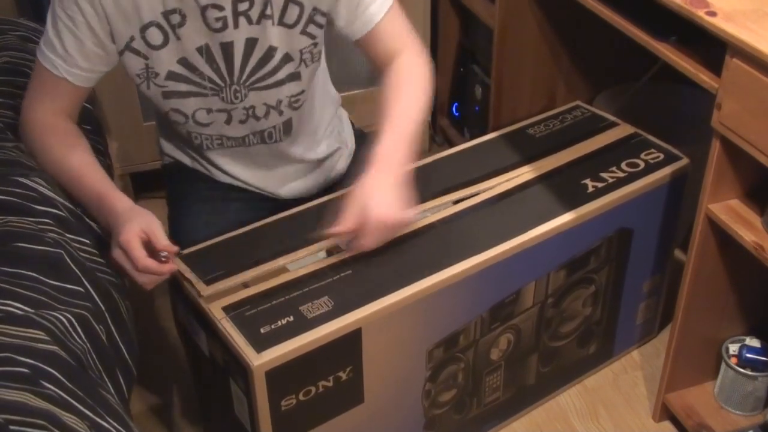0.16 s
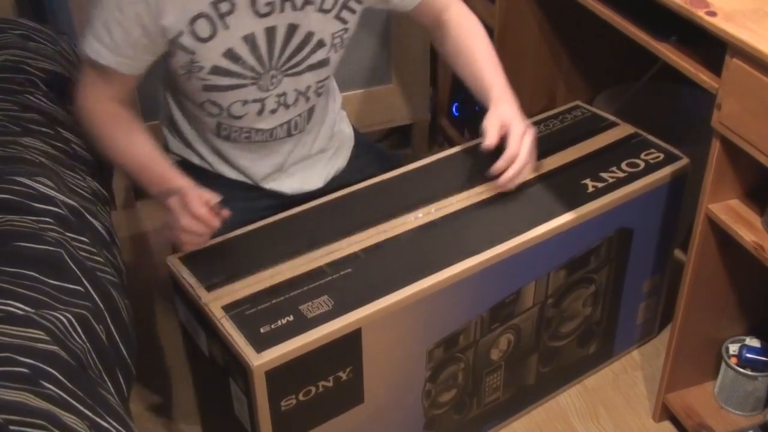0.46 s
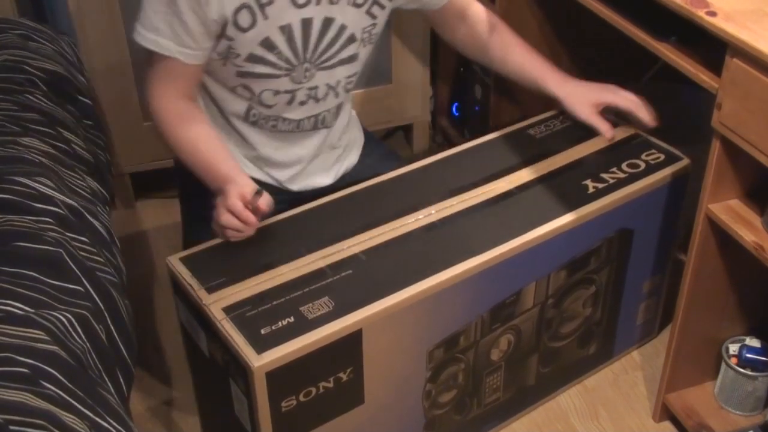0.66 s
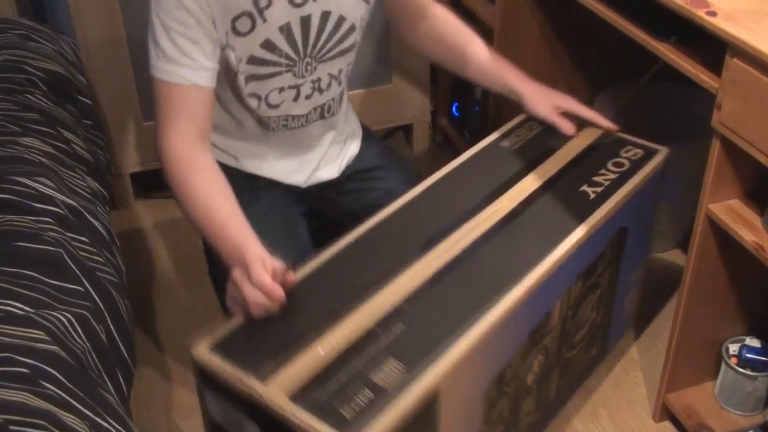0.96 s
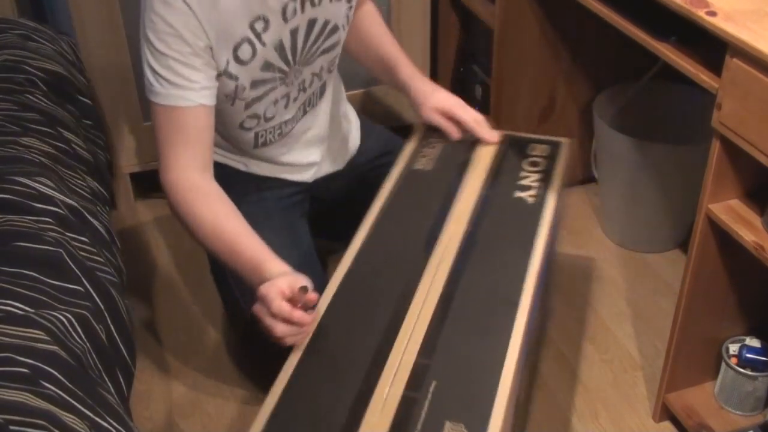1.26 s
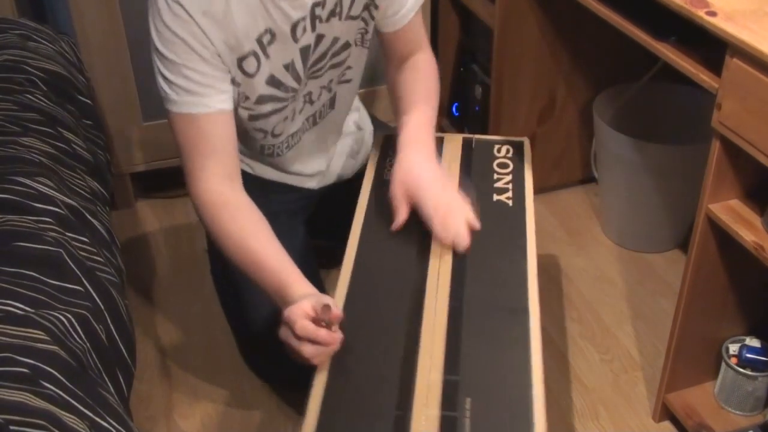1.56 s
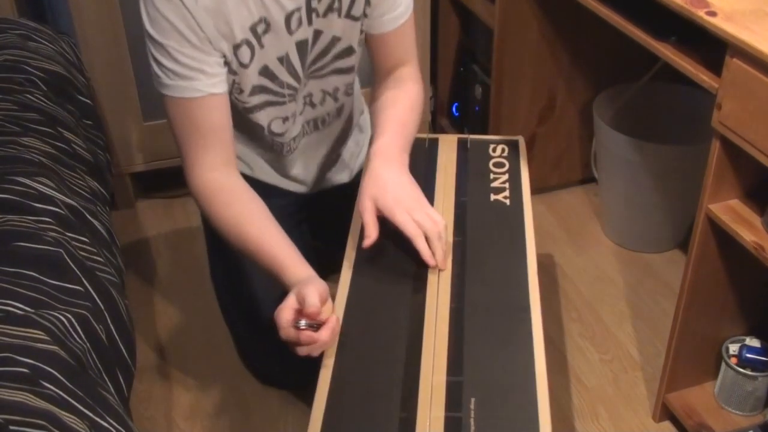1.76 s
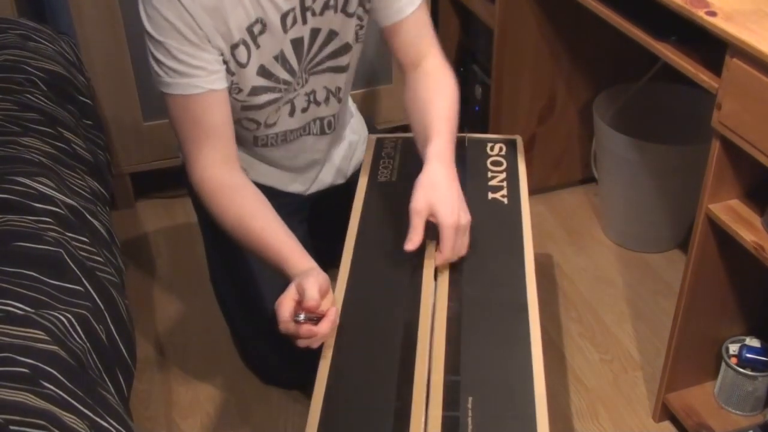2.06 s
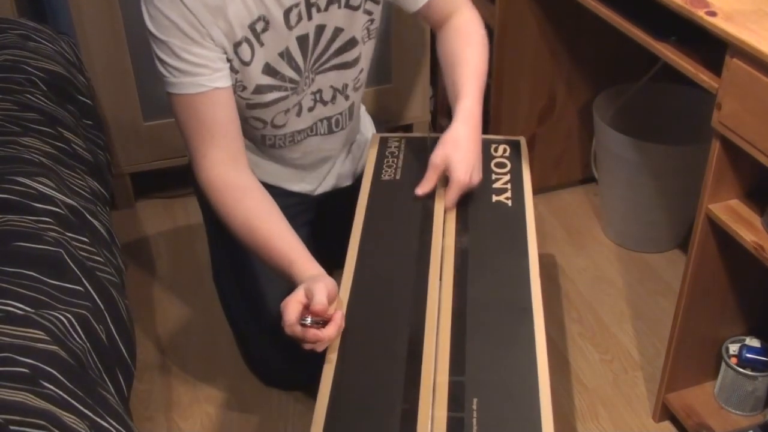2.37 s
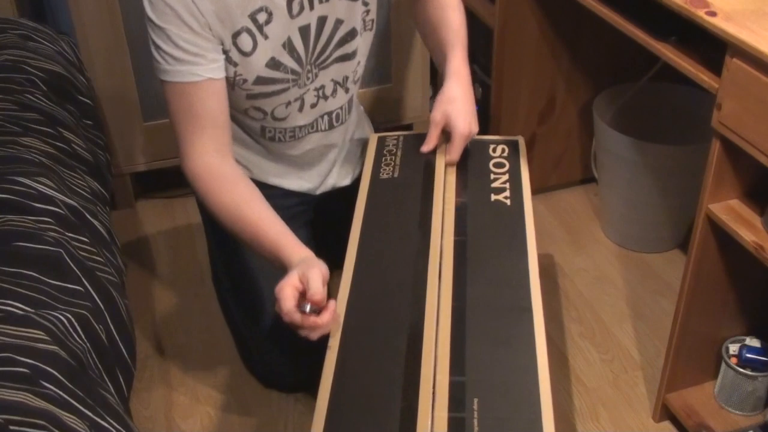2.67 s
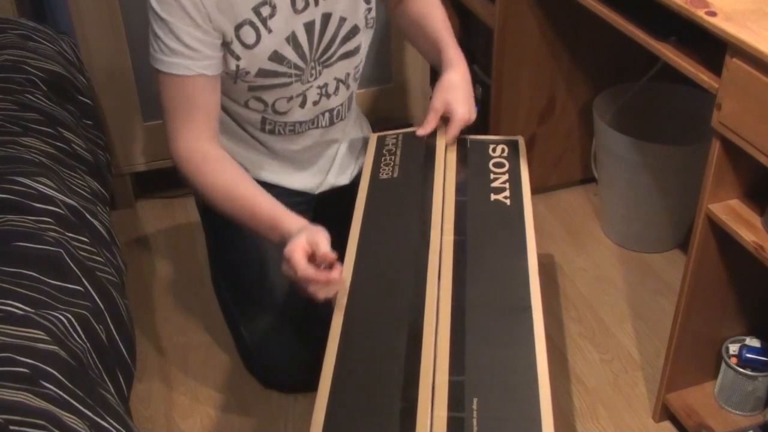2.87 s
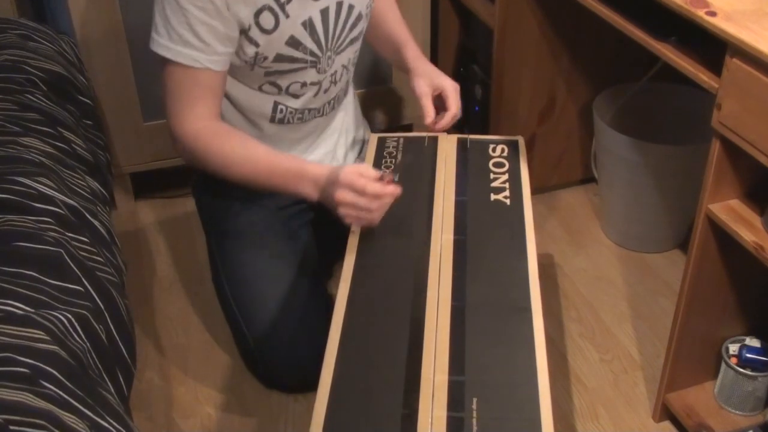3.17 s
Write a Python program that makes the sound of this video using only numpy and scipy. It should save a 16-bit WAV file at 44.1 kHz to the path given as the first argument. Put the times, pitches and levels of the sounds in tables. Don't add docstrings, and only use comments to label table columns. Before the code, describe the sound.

A cardboard box is rubbed, creaks and swings round, then its tape tears with sharp snaps

```python
import sys
import numpy as np
from scipy import signal
from scipy.fft import rfft, irfft
from scipy.io import wavfile
from scipy.ndimage import uniform_filter1d

SR = 44100
rng = np.random.default_rng(int(sys.argv[2]) if len(sys.argv) > 2 else 0)


def amplitude_ratio(level_db):
    exponent = np.asarray(level_db, float) / 20
    return 10 ** exponent


def log_audio(samples):
    frames = np.atleast_2d(samples).T
    limited = np.clip(frames, -1, 1)
    pcm = np.round(limited * 32767).astype(np.int16)
    wavfile.write(sys.argv[1], SR, pcm)


N = 145530

# (frequency [Hz], level [dB])
ROOM_TONE_COLOUR = [(15, -75), (25, 5), (132, -10), (333, -20), (437, -7), (713, -3.5), (4310, -12),
                    (14300, -25.5), (16800, -39)]
ROOM_TONE_DB = -60
HUM_HZ, HUM_WIDTH_HZ, HUM_DB = 128, 27, -63.5
ROOM_T60_S, ROOM_DB = 0.17, -12
SIDE_DB, SIDE_LOW_HZ, SIDE_TOP_HZ = -11.5, 140, 11300

# (frequency [Hz], level [dB])
BOX_COLOUR = [(18, -47), (40, -11), (105, -14.5), (216, 0), (366, -4), (427, 1), (744, -1.5), (1200, -18),
              (1560, -24), (2640, -120)]
# (frequency [Hz], level [dB])
SLIDE_COLOUR = [(470, -40.5), (800, -2.5), (1830, 0), (1970, -3.5), (2320, -2.5), (3790, -0.5),
                (12800, -4.5), (16000, -15.5)]
# (frequency [Hz], level [dB])
TAPE_COLOUR = [(530, -22.5), (900, -9), (1370, -4), (1720, -3.5), (2270, -3.5), (4980, -1.5), (12100, -6),
               (16000, -15.5)]

# (time [s], peak [dB], centre [Hz], fade [s])
THUMPS = [(.5, -42, 850, 0.011), (.505, -30.5, 1420, 0.021), (0.589, -32, 555, 0.035),
          (.6, -36, 139, 0.021), (.84, -47.5, 60, 0.034), (.904, -30, 770, 0.015), (.906, -30, 220, .02),
          (1.488, -34.5, 327, 0.029), (1.497, -36, 127, 0.031), (1.501, -43.5, 55.4, 0.037),
          (2.095, -30, 450, 0.031), (2.101, -41, 69.6, 0.051), (2.259, -47, 70, .03),
          (2.395, -18.5, 710, 0.0046), (2.4, -32, 263, 0.052), (2.697, -11.5, 890, 0.0087),
          (2.706, -21, 540, 0.011), (2.728, -27.5, 405, 0.0094), (2.715, -27.5, 244, 0.024),
          (2.719, -46, 64.6, .03), (2.949, -15.5, 356, 0.0034), (2.95, -30, 1690, 0.0099),
          (2.951, -23, 900, 0.034), (2.95, -17.5, 2570, 0.029), (2.955, -25, 324, 0.029),
          (2.955, -21, 1670, 0.039), (2.965, -24, 207, 0.026), (2.949, -42.5, 69.6, 0.091),
          (3.089, -38, 570, 0.019), (3.12, -50, 70, 0.027)]

# (time [s], rate [Hz])
GROAN_ARC = [(.18, 130.4), (.225, 146), (.27, 182), (.32, 187), (.35, 208.7), (.41, 220), (.45, 181),
             (.5, 167)]
# (middle [s], half length [s], level [dB])
GROAN_SWELLS = [
    (0.22, 0.012, -55.5),
    (0.256, 0.014, -47.5),
    (0.283, .018, -49.5),
    (.312, .01, -54),
    (0.349, 0.013, -46),
    (0.406, 0.011, -47),
    (0.45, 0.0071, -48),
    (.488, 0.011, -54),
    (.35, .15, -63),
]
# (middle [s], half length [s],
# pitch [Hz], level [dB])
SHORT_TONES = [(0.379, 0.024, 437, -47.5), (0.429, 0.011, 410, -54), (0.521, 0.016, 436, -45.5),
               (.61, 0.028, 515.5, -47.5), (.911, 0.0052, 197, -34.5), (.919, 0.0076, 473, -34),
               (.941, 0.017, 193, -40), (2.962, 0.0071, 576, -35.5), (2.983, 0.0073, 462, -33),
               (2.997, .012, 231, -35.5), (3.097, 0.0081, 613, -49), (3.117, 0.0053, 1500, -47),
               (3.161, 0.034, 134, -49)]
GLIDE_PER_S = 1.6

# (start [s], rise [s], hold [s], level [dB], weight on the box [dB])
RUSTLES = [
    (.499, 0.00073, 0.0051, -31, -10.5),
    (.57, 0.011, 0.034, -34, -16),
    (.645, .002, 0.059, -48, -10),
    (.903, 0.0022, 0.0093, -41, 3),
    (1.48, 0.0021, 0.045, -39.5, -6),
    (1.986, 0.0025, 0.012, -55, -7),
    (2.949, 0.00089, 0.0059, -28.5, -4),
]
# (start [s], rise [s], hold [s], level [dB], weight on the box [dB])
GRIPS = [
    (.789, 0.00035, 0.0099, -39.5, -41),
    (.811, 0.0013, 0.011, -38.5, -28),
]
GRIP_HZ, GRIP_WIDTH_HZ = 3200, 1800

# (time [s], level [dB], weight on the box [dB])
SLIDE = [(0, -61.5, -5), (.08, -58, -17), (0.128, -44, -9), (.22, -42, -15), (.42, -44, -9.5),
         (.55, -48, -11), (.74, -44.5, -22), (.88, -45.5, -6.5), (1.0, -37.5, -11), (1.21, -37.5, -17),
         (1.38, -39, -16), (1.6, -44.5, -8), (1.76, -44.5, -11.5), (1.94, -55.5, -6), (2.06, -48.5, -14),
         (2.28, -41.5, -10.5), (2.399, -30.5, -11)]
# (time [s], level [dB], weight on the box [dB])
BRUSH = [
    (2.742, -35.5, -18),
    (2.82, -51, 0.5),
    (2.929, -50, -13.5),
    (2.97, -40, -5),
    (3.06, -39.5, -13),
    (3.14, -40.5, -5.5),
    (3.2, -55.5, -4),
    (3.3, -83, 11),
]
# (middle [s], half length [s], centre [Hz], level [dB])
SQUEAKS = [(1.203, 0.035, 3900, -40), (1.338, 0.021, 2740, -38.5), (2.002, 0.0098, 1620, -51),
           (2.104, 0.021, 4400, -28), (2.231, 0.019, 4600, -35), (2.395, 0.02, 5200, -33),
           (2.45, .024, 4220, -26.5), (2.485, 0.013, 3780, -35), (2.697, .015, 4200, -33),
           (2.848, 0.052, 2670, -48), (3.037, 0.014, 3720, -39), (3.082, 0.02, 3800, -39),
           (3.083, .018, 1600, -52)]

# (time [s], peak [dB], centre [Hz])
SNAPS = [(0.4997, -9.5, 6140), (0.508, -14, 6500), (0.5157, -33, 4630), (0.6466, -15.5, 8520),
         (0.6626, -15, 8620), (0.7891, -14.5, 3870), (0.8107, -17, 2360), (1.2135, -17, 3640),
         (1.48, -17.5, 3580), (1.9689, -28, 9500), (2.0443, -23.5, 8900), (2.0846, -15, 4840),
         (2.173, -15, 1580), (2.2042, -8, 4570), (2.2045, -7, 11500), (2.3143, -16, 1590),
         (2.3313, -6, 10600), (2.5432, -11, 2820), (2.5965, -9, 10700), (2.67, -13, 4900),
         (2.6969, -14, 2000), (2.9489, -3, 1690)]
# (time [s], peak [dB], centre [Hz])
CRACKS = [(0.5654, -24.5, 2930), (0.717, -23, 7050), (2.0983, -20, 5140), (2.1064, -16, 5220),
          (2.2134, -16, 5590), (2.3414, -16, 5600), (2.381, -10.5, 4070), (2.391, -10, 4420),
          (2.3962, -8, 6300), (2.4234, -15, 6200), (2.4363, -8, 4930), (2.4484, -21, 4870),
          (2.4534, -10, 3340), (2.466, -15, 4360), (2.4776, -10, 3160), (2.4944, -11, 4610),
          (2.5431, -11, 8340), (2.5484, -13, 4330), (2.5967, -8, 10600), (2.6049, -10.5, 4600),
          (2.6701, -9, 4980), (2.6824, -6, 4240), (2.709, -6.5, 4330), (2.7324, -13, 3470)]
# (start [s], rise [s], hold [s], level [dB], weight on the box [dB])
PULLS = [(2.072, 0.015, 0.022, -29.5, -19.5), (2.12, 0.017, .03, -36.5, -14),
         (2.165, 0.013, 0.023, -31.5, -11), (2.204, 0.0013, 0.0062, -31, -27),
         (2.31, 0.0093, 0.022, -34, -10.5), (2.331, 0.0026, 0.024, -29, -17),
         (2.381, 0.0051, 0.021, -25.5, -15), (2.405, 0.012, .02, -30.5, -16),
         (2.425, 0.017, 0.026, -26, -9.5), (2.47, 0.0031, 0.04, -29.5, -15),
         (2.543, 0.0017, 0.011, -27, -18.5), (2.596, 0.00082, 0.042, -27, -19),
         (2.67, 0.0012, 0.022, -24.5, -13.5), (2.697, 0.0039, 0.023, -27.5, -8.5)]
# (frequency [Hz], width [Hz], level [dB])
TAPE_RINGS = [
    (760, 200, -9),
    (1660, 260, -2.5),
]
RELEASE_S = 0.032

BASS_HZ, TOP_HZ = 36, 15200


def unit(x):
    return x / np.sqrt(np.mean(x ** 2) + 1e-20)


def colour(x, points):
    hz, db = np.array(points, float).T
    bins_hz = np.arange(2049) * SR / 4096
    log_gain = np.interp(np.log(bins_hz + 1), np.log(hz), db) * np.log(10) / 20
    cepstrum = irfft(log_gain)
    cepstrum[1:2048] *= 2
    cepstrum[2049:] = 0
    impulse = irfft(np.exp(rfft(cepstrum)))
    return signal.fftconvolve(x, impulse)[:N]


def ring(x, hz, width_hz):
    b, a = signal.iirpeak(min(hz, .45 * SR), hz / width_hz, fs=SR)
    return signal.lfilter(b, a, x)


def walk(rate):
    k = int(SR / rate)
    steps = np.repeat(rng.standard_normal(N // k + 1), k)
    return unit(uniform_filter1d(uniform_filter1d(steps, k), k)[:N])


def curve(rows, column):
    rows = np.array(rows, float)
    return np.interp(np.arange(N) / SR, rows[:, 0], rows[:, column], left=-150, right=-150)


def strokes(rows):
    t, force, weight = np.arange(N) / SR, 0, 0
    for s, rise_s, hold_s, db, box_db in rows:
        rise = np.clip((t - s) / max(rise_s, 1e-4), 0, 1)
        shape = rise * np.exp(-np.maximum(t - s - rise_s - hold_s, 0) / RELEASE_S)
        force = np.hypot(force, amplitude_ratio(db) * shape)
        weight = np.hypot(weight, amplitude_ratio(db + box_db) * shape)
    return force, weight


def friction(press, points, rate, spread_db, patchy_db, grit_db, burst_s):
    force, weight = press
    size = np.minimum(rng.exponential(size=N), 3)
    slips = (rng.random(N) < rate / SR) * amplitude_ratio(spread_db * size)
    fading = signal.lfilter([1], [1, -np.exp(-1 / (max(burst_s, 1e-5) * SR))], slips)
    bursts = fading * rng.standard_normal(N)
    grain = rng.standard_normal(N) + amplitude_ratio(grit_db) * unit(bursts)
    surface = unit(colour(grain, points)) * amplitude_ratio(patchy_db * walk(90))
    hollow = unit(colour(grain, BOX_COLOUR)) * amplitude_ratio(1.65 * walk(30.47))
    return force * surface + weight * hollow


def room_tone():
    hiss = np.array([unit(colour(rng.standard_normal(N), ROOM_TONE_COLOUR)) for _ in range(2)])
    hum = unit(ring(rng.standard_normal(N), HUM_HZ, HUM_WIDTH_HZ))
    return amplitude_ratio(ROOM_TONE_DB) * hiss * amplitude_ratio([[0], [-6]]) + amplitude_ratio(HUM_DB) * hum * [[1], [.1]]


def room(x):
    t = np.arange(SR // 2) / SR
    fade = np.exp(-np.log(1000) * t / ROOM_T60_S) * np.minimum(t / 0.0043, 1)
    tails = rng.standard_normal((2, len(t))) * fade
    tails = tails * np.exp(-t / 0.044) + signal.lfilter([.1], [1, -.6], tails)
    tails = tails / np.sqrt((tails ** 2).sum(axis=1, keepdims=True))
    mid, side = signal.fftconvolve(x[None], tails)[:, :N]
    side = signal.sosfilt(signal.butter(2, SIDE_LOW_HZ, "high", fs=SR, output="sos"), side)
    side = signal.sosfilt(signal.ellip(3, .5, 9, SIDE_TOP_HZ, fs=SR, output="sos"), side)
    side = side + .5 * ring(side, 8000.0, 9100.0)
    return np.array([x + amplitude_ratio(ROOM_DB) * mid, amplitude_ratio(SIDE_DB) * side])


def thumps():
    out, t = np.zeros(N + 8192), np.arange(8192) / SR
    for (s, peak_db, hz, fade_s), noise in zip(THUMPS, rng.standard_normal((len(THUMPS), len(t)))):
        push = noise * np.minimum(t / 0.0012, 1) * np.exp(-t / max(fade_s, .003))
        wide = ring(ring(push, hz, 1.6 * hz), hz, 1.6 * hz)
        x = wide + 1.2 * ring(wide, hz, .25 * hz)
        i = int(s * SR)
        out[i:i + len(t)] += amplitude_ratio(peak_db + 1.0) * x / np.abs(x).max()
    return out[:N]


def groan():
    t = np.arange(N) / SR
    waver = np.cumsum(walk(89.9)) / SR

    def bout(s, half_s, db):
        return amplitude_ratio(db + 6) * np.exp(-np.abs((t - s) / max(half_s, .004)) ** 2.5)

    def tone(phase):
        return np.sin(phase) + 0.12 * np.sin(2 * phase)

    arc_hz = np.interp(t, *np.array(GROAN_ARC).T) * (1 + 0.059 * walk(89.0))
    out = sum(bout(*row) for row in GROAN_SWELLS) * tone(2 * np.pi * np.cumsum(arc_hz) / SR)
    for s, half_s, hz, db in SHORT_TONES:
        cycles = hz * (t - s + 0.012 * waver + GLIDE_PER_S * (t - s) ** 2 / 2)
        out = out + bout(s, half_s, db) * tone(2 * np.pi * cycles)
    return out * amplitude_ratio(1.73 * walk(90))


def flap():
    force, weight = strokes(GRIPS)
    rasp = unit(ring(rng.standard_normal(N), GRIP_HZ, GRIP_WIDTH_HZ)) * amplitude_ratio(5.7 * walk(120.3))
    hollow = unit(colour(rng.standard_normal(N), BOX_COLOUR))
    rustle = friction(strokes(RUSTLES), TAPE_COLOUR, rate=2200.0, spread_db=5.5, patchy_db=3.5,
                      grit_db=-3.5, burst_s=0.00077)
    return force * rasp + weight * hollow + rustle


def sliding():
    force, weight = 0, 0
    for rows in (SLIDE, BRUSH):
        stroke = amplitude_ratio(curve(rows, column=1))
        force = force + stroke
        weight = weight + stroke * amplitude_ratio(curve(rows, column=2))
    out = friction((force, weight), SLIDE_COLOUR, rate=2500., spread_db=-2.5, patchy_db=0.8,
                   grit_db=-6.5, burst_s=0.00019)
    t, noise = np.arange(N) / SR, rng.standard_normal(N)
    for s, half_s, hz, db in SQUEAKS:
        swell = np.exp(-((t - s) / half_s) ** 2)
        out = out + amplitude_ratio(db) * swell * unit(ring(noise, hz, 0.24 * hz))
    return out


def snaps(rows, fade_s, wide, trim_db):
    out, t = np.zeros(N + 1024), np.arange(1024) / SR
    for (s, db, hz), noise in zip(rows, rng.standard_normal((len(rows), len(t)))):
        x = noise * np.exp(-t / fade_s)
        x = ring(x, hz, 0.5 * hz) + wide * x
        i = int(s * SR)
        out[i:i + len(t)] += amplitude_ratio(db + trim_db) * x / np.abs(x).max()
    return out[:N]


def tape():
    x = friction(strokes(PULLS), TAPE_COLOUR, rate=500., spread_db=2.0, patchy_db=1.0,
                 grit_db=-4.5, burst_s=0.00083)
    return x + sum(amplitude_ratio(db) * ring(x, hz, width_hz) for hz, width_hz, db in TAPE_RINGS)


def scene():
    box = thumps() + groan() + flap() + sliding()
    sharp = snaps(SNAPS, fade_s=0.0015, wide=0.046, trim_db=-4.0)
    cracks = snaps(CRACKS, fade_s=0.0023, wide=0.12, trim_db=-3.5)
    mid, side = room(box + sharp + cracks + tape()) + room_tone()
    return np.array([mid + side, mid - side])


def band_limit(x):
    return signal.sosfilt(signal.butter(12, 16970, fs=SR, output="sos"), x)


def record(dry):
    x = signal.sosfilt(signal.butter(2, BASS_HZ, "high", fs=SR, output="sos"), dry)
    x = signal.sosfilt(signal.ellip(8, .2, 60, TOP_HZ, fs=SR, output="sos"), x)
    return band_limit(x)


dry = scene()
out = record(dry)
log_audio(out)
```